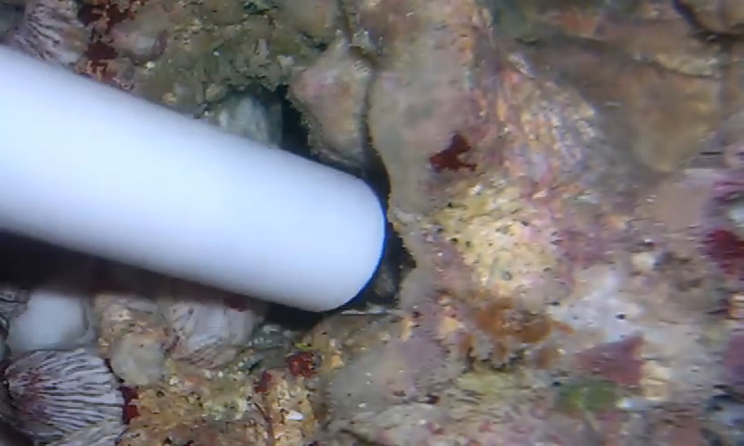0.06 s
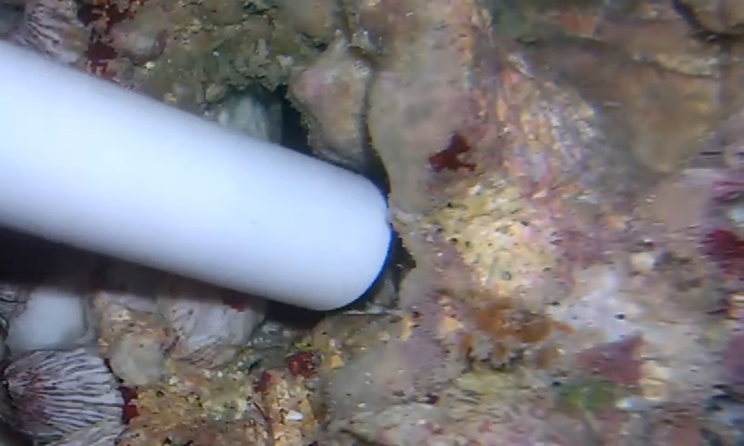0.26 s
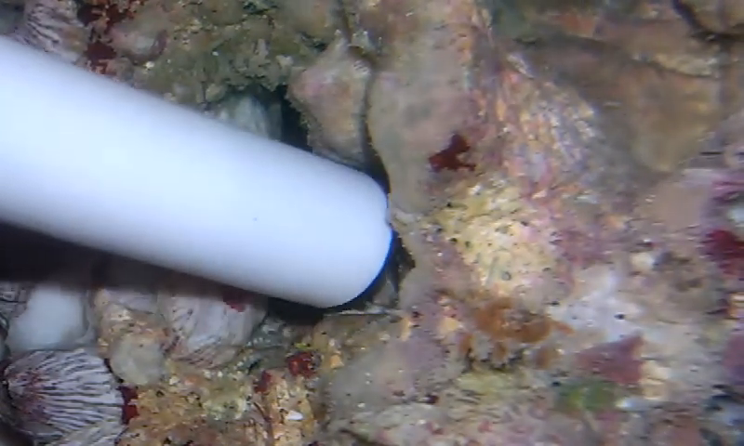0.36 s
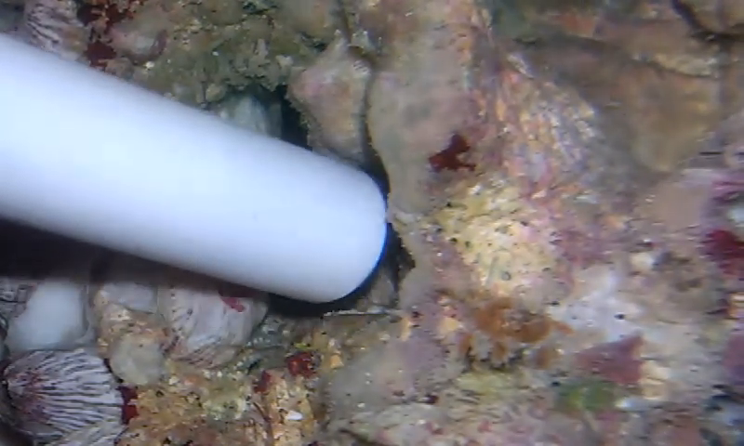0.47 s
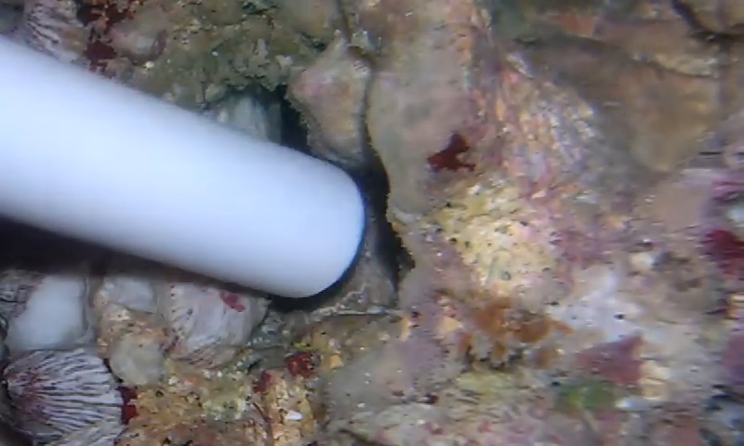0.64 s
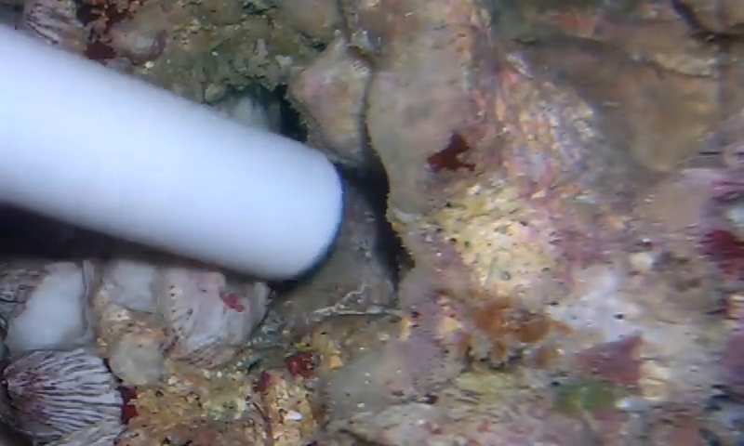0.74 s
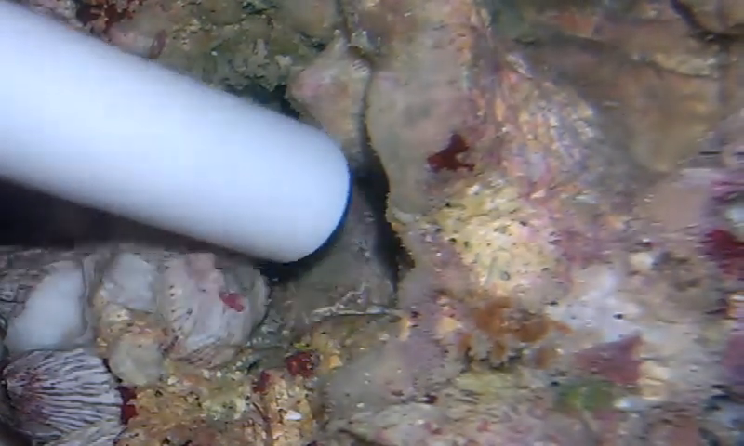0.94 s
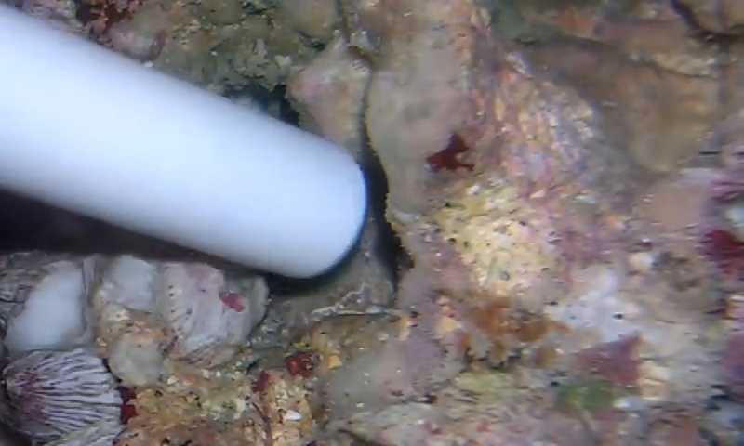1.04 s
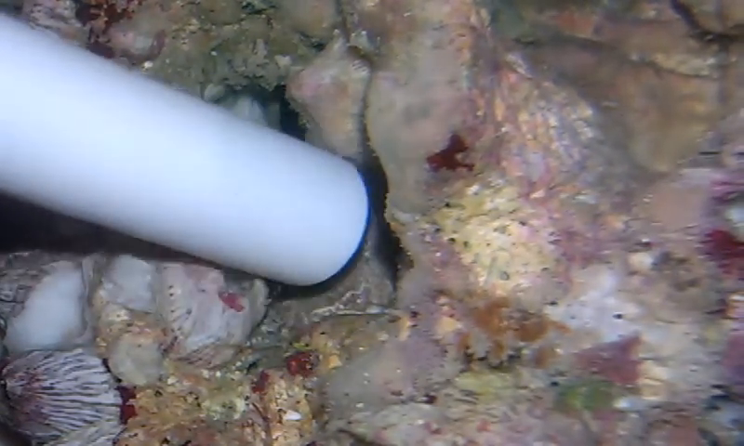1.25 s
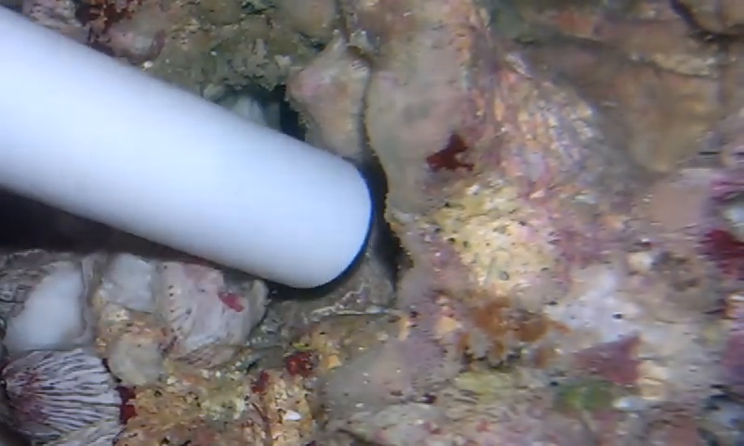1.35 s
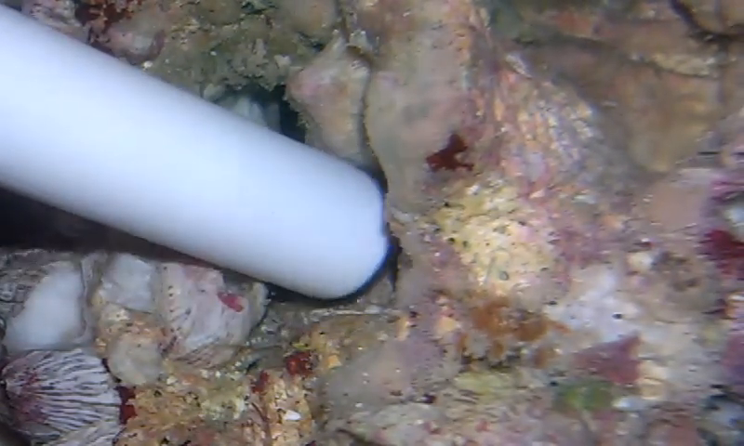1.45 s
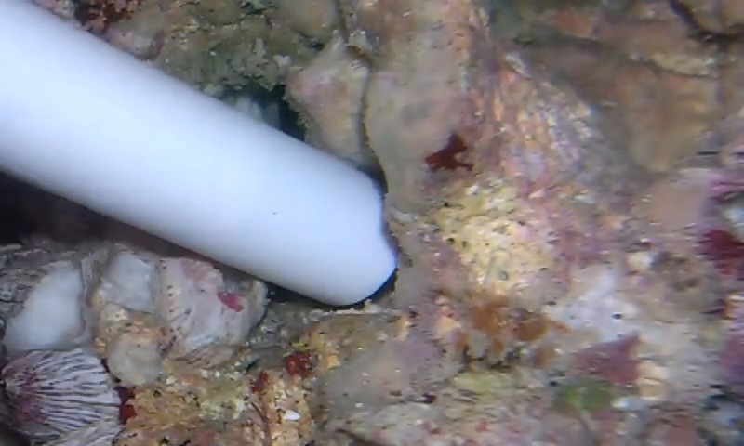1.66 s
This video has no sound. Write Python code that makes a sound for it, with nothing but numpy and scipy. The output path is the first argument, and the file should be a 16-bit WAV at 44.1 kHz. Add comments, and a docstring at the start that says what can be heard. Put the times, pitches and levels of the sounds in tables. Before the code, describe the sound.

A snapping shrimp gives one very sharp snap over faint hum and hiss.

```python
"""Mains hum and soft hiss run from the start; a thin whine comes and goes, tiny crackles sound further
off, and a plastic tube held against a rock rubs faintly as it shifts. At 0.24 s a snapping shrimp living
in the rock fires its claw once at the tube. The collapsing bubble gives a crack that crowds into a few
milliseconds of close reflections, rings, echoes and dies away. The background carries on to the end."""
import sys
import numpy as np
from scipy import signal
from scipy.fft import rfft, irfft, next_fast_len
from scipy.io import wavfile
from scipy.ndimage import uniform_filter1d

SR = 44100
rng = np.random.default_rng(int(sys.argv[2]) if len(sys.argv) > 2 else 0)


def put_to_file(sound):
    """Save the sound as 16-bit audio at rate SR, in the file named by the first command-line argument."""
    columns = np.atleast_2d(sound).T  # one column per channel
    safe = np.clip(columns, -1, 1)
    whole_steps = np.round(safe * 32767)
    wavfile.write(sys.argv[1], SR, whole_steps.astype(np.int16))


N = 74970
T = np.arange(N) / SR
FFT_SIZE = 2 * next_fast_len(N // 2 + SR // 10)
HZ = np.maximum(np.arange(FFT_SIZE // 2 + 1) * SR / FFT_SIZE, 1)
SNAP_S = .24


def from_db(db):
    """Decibels to gain."""
    return 10 ** (np.asarray(db) / 20)


def unit_rms(x):
    """Scale to unit power."""
    return x / np.sqrt(np.mean(np.abs(x) ** 2) + 1e-20)


def curve(table, column=1):
    """One dB column, interpolated over log frequency."""
    points = np.array(table, float)
    return np.interp(np.log(HZ), np.log(points[:, 0]), points[:, column])


def colour(x, shape_db):
    """Minimum-phase filter; white noise keeps its power."""
    cepstrum = irfft(np.log(unit_rms(from_db(shape_db)) + 1e-6))
    cepstrum[1:FFT_SIZE // 2] *= 2
    cepstrum[FFT_SIZE // 2 + 1:] = 0
    return irfft(rfft(x, FFT_SIZE) * np.exp(rfft(cepstrum)))[:N]


def noise():
    """White noise."""
    return rng.standard_normal(N)


def burst(start_s, t60_s, hold_s=0):
    """Envelope: instant attack, hold, exponential release."""
    return (T >= start_s) * from_db(-60 * np.maximum(T - start_s - hold_s, 0) / t60_s)


def scatter(envelope, passes):
    """Dense reflections under an envelope, spectrally flattened."""
    x = envelope * noise()
    for _ in range(passes):
        flat = irfft(np.exp(1j * np.angle(rfft(x, FFT_SIZE))))[:N]
        local_rms = np.sqrt(np.abs(uniform_filter1d(flat ** 2, size=64)) + 1e-12)
        x = envelope * flat / local_rms
    return x


# hiss spectrum: f/Hz, relative level/dB
HISS_SPECTRUM = [(25, 0.5), (45, 3), (80, -4.5), (120, -0.5), (220, 2), (320, -2), (450, -5), (700, -2),
                 (880, -8.5), (1100, -5), (1400, -13.5), (1800, -13), (3000, -14.5), (5000, -15),
                 (6400, -8), (8000, -16.5), (12000, -18), (15500, -16.5)]

def hiss(level_db=-65.5, flicker_db=1.5, flicker_s=.03):
    """Soft hiss; each half octave wavers independently."""
    spectrum = rfft(colour(noise(), curve(HISS_SPECTRUM)), FFT_SIZE)
    half_octave = np.floor(2 * np.log2(SR / 2 / HZ))
    out = np.zeros(N)
    for k in range(20):
        waver = np.interp(T / flicker_s, np.arange(N), noise())
        out += irfft(spectrum * (half_octave == k))[:N] * from_db(flicker_db * waver)
    return from_db(level_db) * out


# mains partials: harmonic number, RMS level/dB
HUM_HARMONICS = [(1, -79), (2, -65.5), (3, -71.5), (4, -71), (6, -78)]

def hum(mains_hz=59.95):
    """Steady mains harmonics, random phases."""
    return sum(from_db(db) * np.sqrt(2) * np.sin(2 * np.pi * (k * mains_hz * T + rng.random()))
               for k, db in HUM_HARMONICS)


# whine spells: start t/s, length/s, level/dB
WHINE_SPELLS = [(.0, 0.061, -73), (0.138, .03, -63.5), (0.197, 0.14, -65.5), (0.32, 0.096, -72.5),
                (0.589, .135, -66), (0.847, 0.089, -70.5), (0.963, 0.14, -65.5), (1.164, 0.013, -64),
                (1.3, 0.052, -64.5), (1.374, 0.05, -64), (1.677, .04, -64.5)]

def whine(centre_hz=6119, width_hz=137, idle_db=-77, fade_s=.0085, evening=.2):
    """Narrow, unsteady resonance swelling in short spells."""
    resonance_db = -20 * np.log10(1 + (2 * (HZ - centre_hz) / width_hz) ** 2)
    tone = unit_rms(colour(noise(), resonance_db))
    fading = np.abs(signal.hilbert(tone)) + .016
    tone = unit_rms(tone / fading ** evening)  # partly evens out the fading
    spells = sum(from_db(db) * np.clip(np.minimum(T - start, start + length - T) / fade_s + .5, 0, 1)
                 for start, length, db in WHINE_SPELLS)
    return tone * np.hypot(from_db(idle_db), spells)


# crackle events: t/s, level/dB
CRACKLES = [(.004, -60.5), (.138, -66), (.192, -64), (0.47, -57), (1.053, -62), (1.139, -63.5),
            (1.204, -67.5), (1.374, -69), (1.441, -59.5), (1.488, -68), (1.532, -69), (1.608, -68)]
# crackle spectrum: f/Hz, relative level/dB
CRACKLE_SPECTRUM = [(1000, -19), (3000, -11), (6300, 4.5), (8500, -4), (12000, -5), (15500, -8.5)]

def crackles(t60_s=.1, rise_s=.005):
    """Tiny bright crackles with short tails, blurred by distance."""
    envelope = sum(from_db(db) * burst(start, t60_s) for start, db in CRACKLES)
    blurred = uniform_filter1d(envelope, size=int(rise_s * SR))
    return colour(noise() * blurred, curve(CRACKLE_SPECTRUM))


# tube shifts: centre t/s, length/s, centre f/Hz, width/octaves, level/dB
TUBE_RUBS = [(0.024, 0.023, 2520, 0.096, -69.5), (0.072, 0.036, 2980, 0.063, -72.5),
             (0.174, 0.049, 5800, 0.06, -67), (0.198, 0.016, 4430, 0.36, -65),
             (0.402, 0.029, 2120, 0.17, -73), (0.456, 0.053, 2140, 0.24, -71),
             (.445, 0.033, 5500, 0.46, -65), (0.487, 0.034, 4800, .55, -61),
             (0.485, 0.034, 10000, 0.087, -67.5), (.572, .03, 2590, 0.084, -66),
             (0.638, 0.014, 1300, 0.19, -70), (.64, .04, 5000, 0.22, -74), (0.854, 0.0069, 6540, .12, -67),
             (0.956, 0.047, 6000, .5, -77), (1.065, 0.026, 3940, 0.35, -65),
             (1.138, 0.023, 1530, 0.063, -67.5), (1.146, 0.038, 2930, 0.073, -71),
             (1.178, .02, 6400, 0.072, -61), (1.21, 0.018, 4260, 0.19, -69.5),
             (1.26, 0.039, 3800, .17, -69), (1.266, 0.024, 2490, 0.041, -71),
             (1.335, 0.037, 2320, 0.11, -74), (1.367, 0.13, 446, 0.54, -73), (1.383, 0.031, 6440, .2, -67),
             (1.453, 0.031, 2300, 0.3, -63.5), (1.552, 0.048, 4530, 0.24, -68.5),
             (1.572, 0.037, 2910, 0.064, -68), (1.629, 0.047, 3940, 0.71, -65),
             (1.666, 0.035, 2120, 0.12, -70.5)]

def tube_rubs(grain_db=4, skirt_db=-27):
    """Each shift of the tube: a swell of grainy friction in one band."""
    out = np.zeros(N)
    for centre_s, length_s, hz, octaves, db in TUBE_RUBS:
        grains = unit_rms(noise() * from_db(grain_db * noise()))
        band = np.exp(-.5 * (np.log2(HZ / hz) / octaves) ** 2) + from_db(skirt_db)
        friction = irfft(rfft(grains, FFT_SIZE) * unit_rms(band))[:N]
        swell = np.exp(-2 * ((T - centre_s) / length_s) ** 2)
        out += from_db(db) * swell * friction
    return out


# notches in crack, flutter and reverb: f/Hz, half-width/Hz, depth/dB
SNAP_NOTCHES = [(1790, 84, 31), (2830, 49, 18), (5170, 72, 2), (8550, 240, 31), (11700, 130, 3)]

def notched(x, shape_db):
    """Colour x, with the snap's Gaussian notches cut in."""
    cut_db = sum(depth * np.exp(-((HZ - hz) / width) ** 2) for hz, width, depth in SNAP_NOTCHES)
    return colour(x, shape_db - cut_db)


# reverb spectra: f/Hz, early relative level/dB, late relative level/dB
REVERB_SPECTRA = [(205, -48.5, -51), (710, 1.5, -6), (1370, 7.5, -8.5), (3500, 0.5, -3), (5000, -21, -8.5),
                  (6240, 9, 3.5), (7900, -35, -3.5), (10300, -25, -4), (12500, 11, -7), (13700, 12, 2.5),
                  (16000, 17, -2.5)]

def reverb(early_db=-29.5, late_db=-39.5):
    """The snap's diffuse tail, in two decay stages."""
    early = notched(noise() * burst(SNAP_S, t60_s=.11), curve(REVERB_SPECTRA, column=1))
    late = notched(noise() * burst(SNAP_S, t60_s=.23), curve(REVERB_SPECTRA, column=2))
    return from_db(early_db) * early + from_db(late_db) * late


# modes of the surroundings: f/Hz, level/dB, T60/s
RING_MODES = [(1550, -45.5, 0.063), (3460, -48.5, 0.047), (6710, -31, 0.027), (10080, -37, 0.077),
              (11270, -31.5, 0.029), (15100, -43, 0.1), (16000, -22, 0.05)]

def ring():
    """Damped modes of the surroundings, struck by the snap."""
    return sum(from_db(db) * burst(SNAP_S, t60_s) * np.sin(2 * np.pi * hz * (T - SNAP_S))
               for hz, db, t60_s in RING_MODES)


# flutter spectrum: f/Hz, relative level/dB
FLUTTER_SPECTRUM = [(500, -37), (1400, -17), (4000, -17.5), (6500, -24.5), (10000, -16), (12000, -15),
                    (13800, 0), (15500, -3.5)]

def flutter(gap_s=.011, first_re_crack_db=-5, loss_db=13):
    """Three fading echoes between two surfaces."""
    bounces = sum(from_db(first_re_crack_db - loss_db * k) * burst(SNAP_S + (k + 1) * gap_s, t60_s=.012)
                  for k in range(3))
    return notched(scatter(bounces, passes=2), curve(FLUTTER_SPECTRUM))


# crack spectrum: f/Hz, relative level/dB
CRACK_SPECTRUM = [(100, -45), (450, -40), (850, -17), (1400, -22), (2400, -11.5), (3600, -8), (5000, -14.5),
                  (6500, -10.5), (7800, -12.5), (10000, -6), (11000, -0.5), (12000, -16), (13200, 3),
                  (15500, 2.5)]

def crack():
    """Bubble collapse, crowded into milliseconds of close reflections."""
    envelope = burst(SNAP_S, t60_s=.013, hold_s=.004)
    return notched(scatter(envelope, passes=6), curve(CRACK_SPECTRUM))


def scene(crack_db=-19.5):
    """One snap over the quiet background, mono."""
    snap = from_db(crack_db) * (crack() + flutter()) + ring() + reverb()
    return (snap + hum() + hiss() + whine() + tube_rubs() + crackles())[None]


def record(dry, cutoff_hz=15750):
    """Steep elliptic low-pass."""
    return signal.sosfilt(signal.ellip(10, .2, 75, cutoff_hz, fs=SR, output="sos"), dry)


dry = scene()
out = record(dry)
put_to_file(out)
```